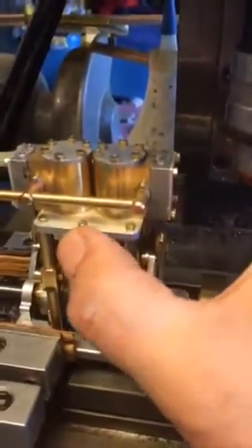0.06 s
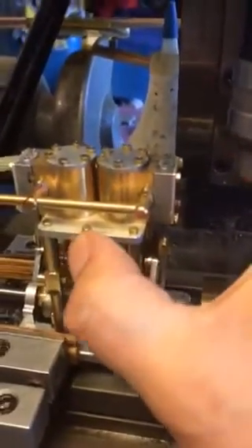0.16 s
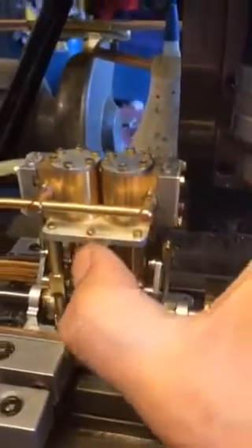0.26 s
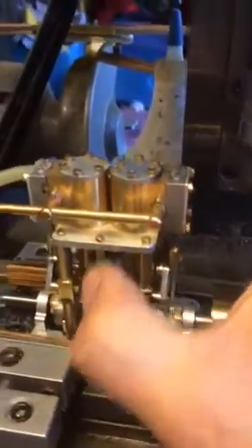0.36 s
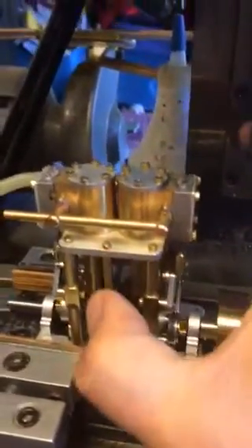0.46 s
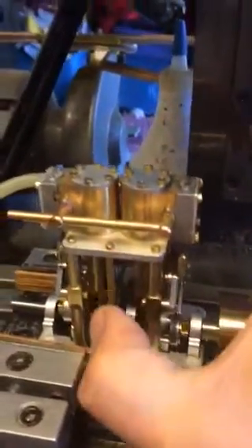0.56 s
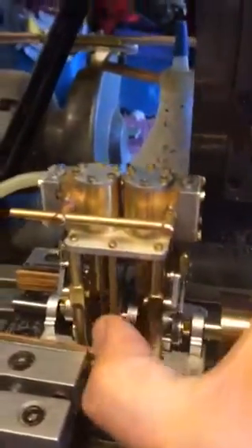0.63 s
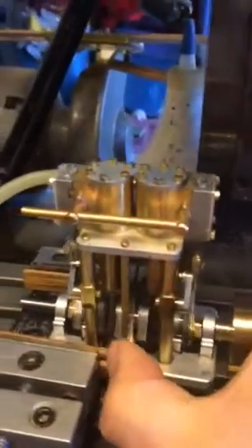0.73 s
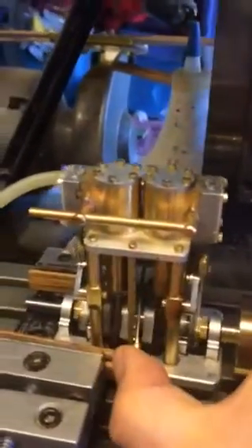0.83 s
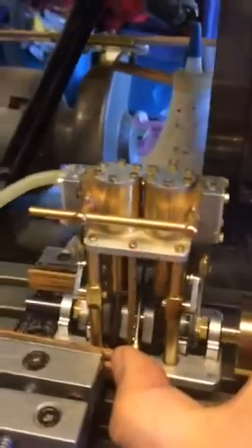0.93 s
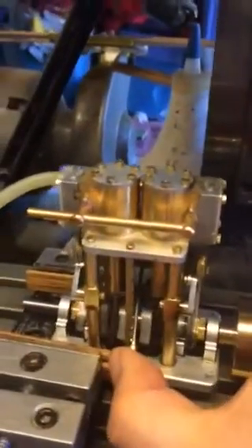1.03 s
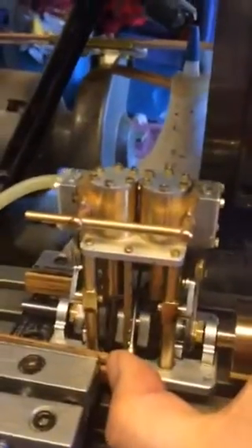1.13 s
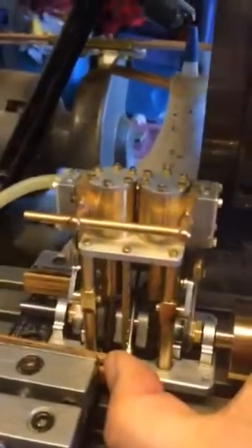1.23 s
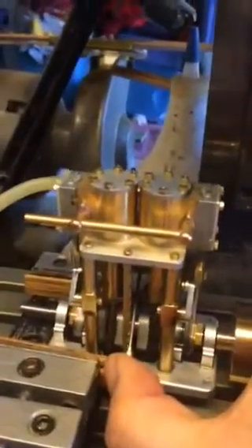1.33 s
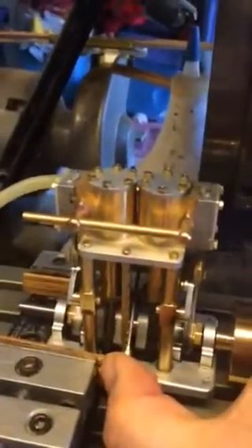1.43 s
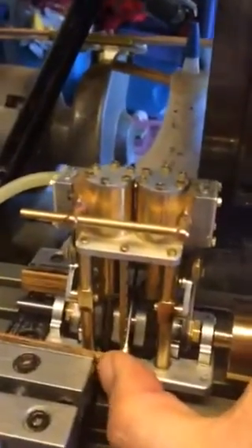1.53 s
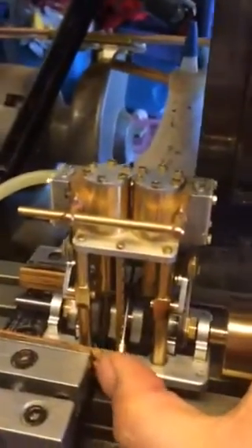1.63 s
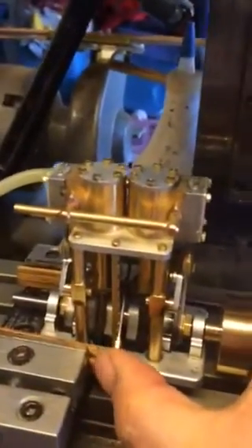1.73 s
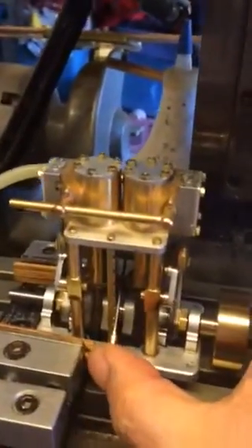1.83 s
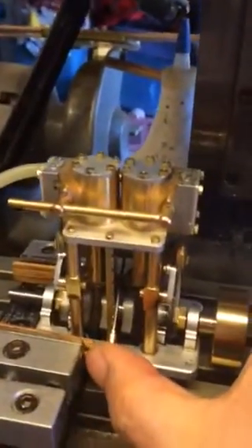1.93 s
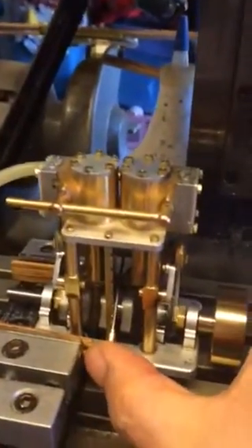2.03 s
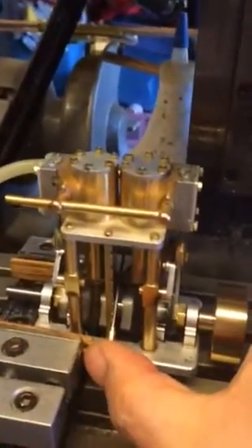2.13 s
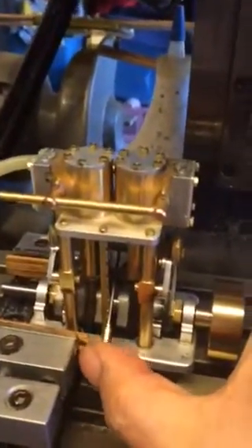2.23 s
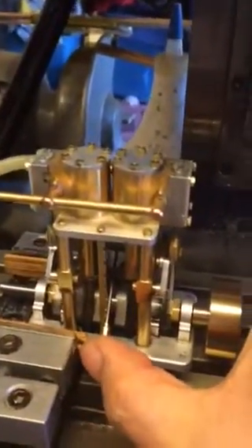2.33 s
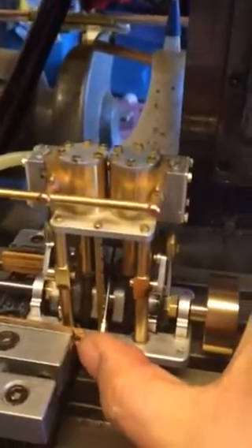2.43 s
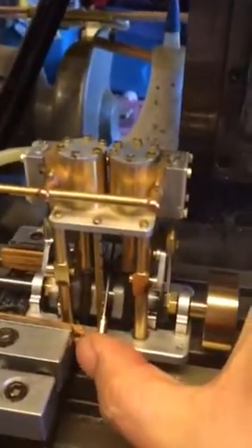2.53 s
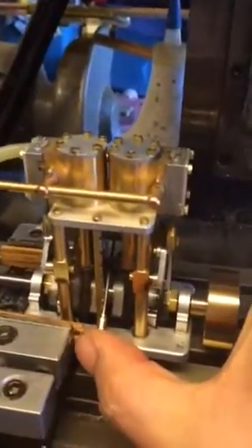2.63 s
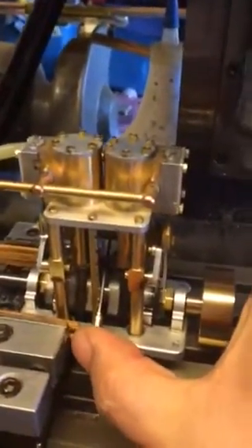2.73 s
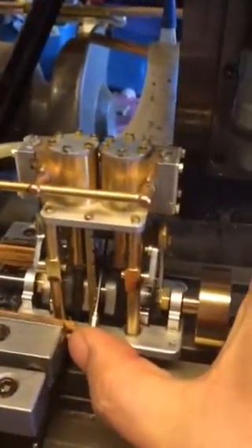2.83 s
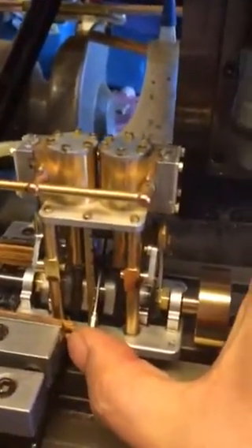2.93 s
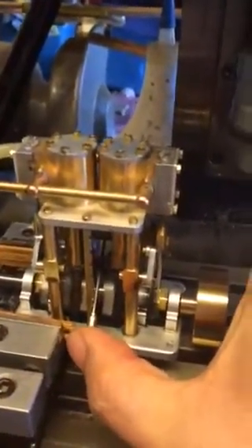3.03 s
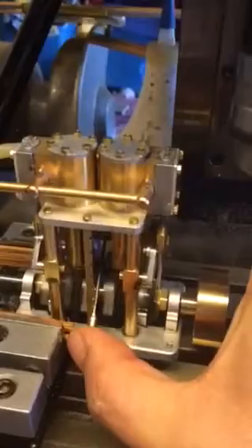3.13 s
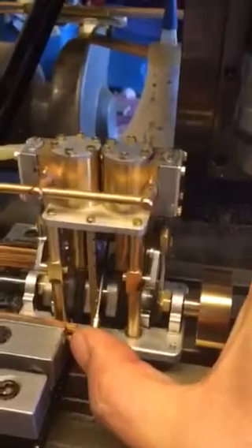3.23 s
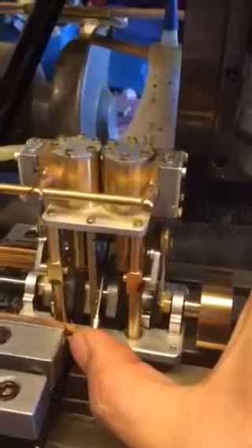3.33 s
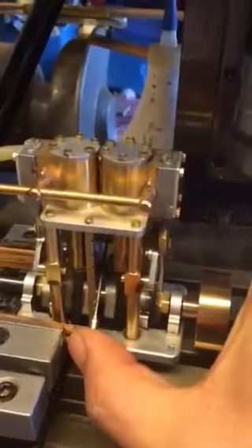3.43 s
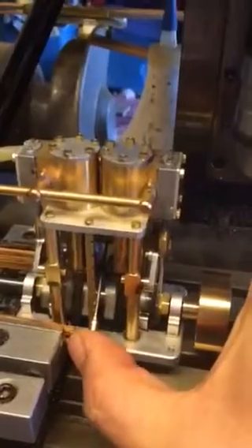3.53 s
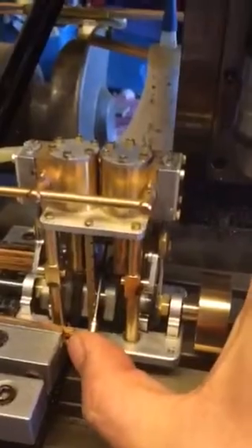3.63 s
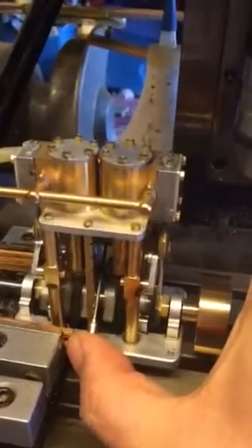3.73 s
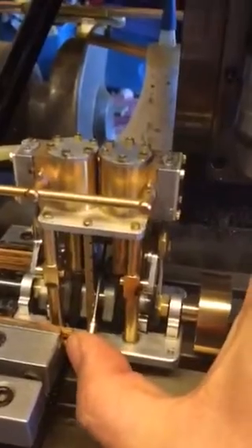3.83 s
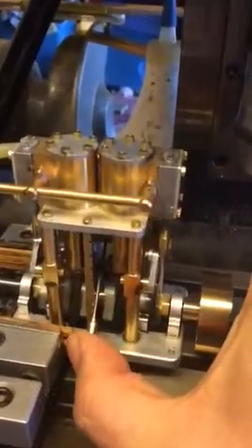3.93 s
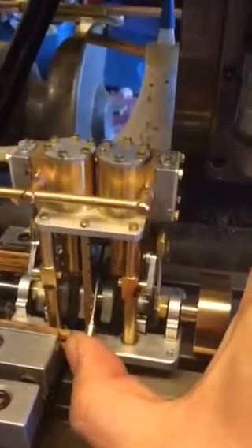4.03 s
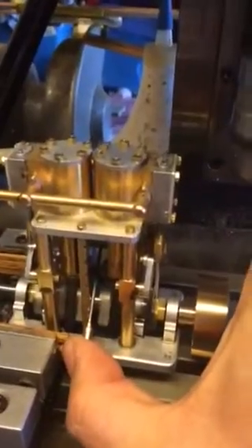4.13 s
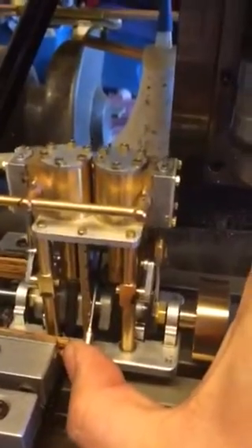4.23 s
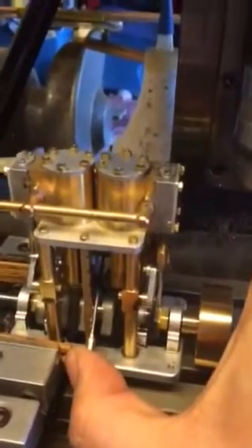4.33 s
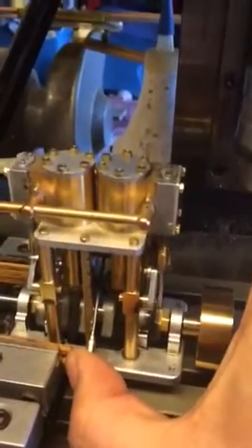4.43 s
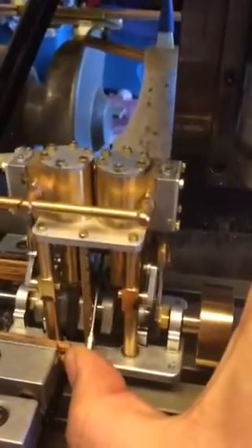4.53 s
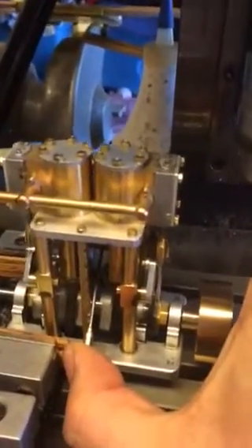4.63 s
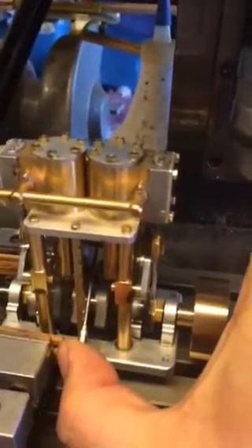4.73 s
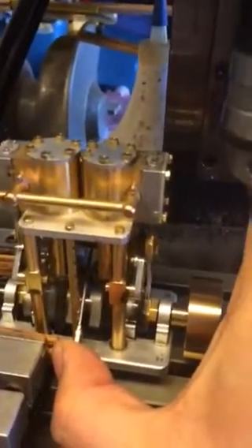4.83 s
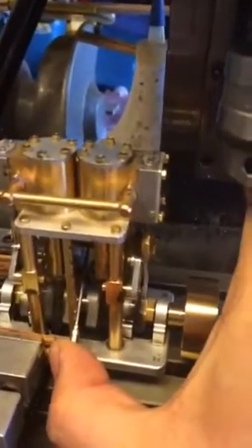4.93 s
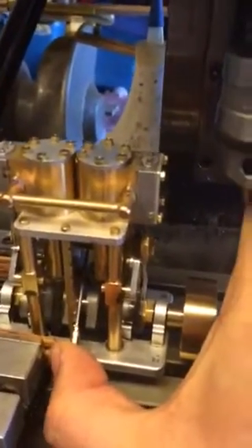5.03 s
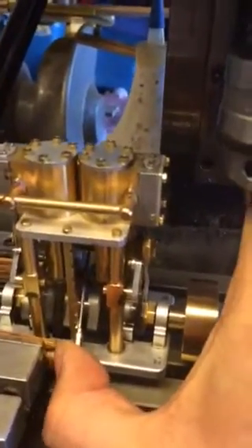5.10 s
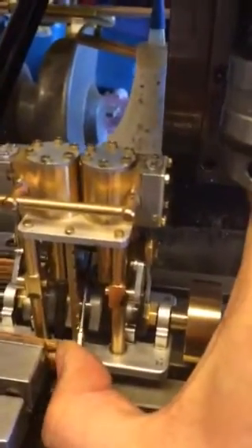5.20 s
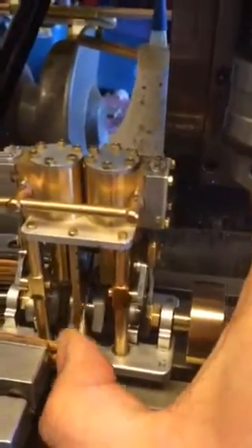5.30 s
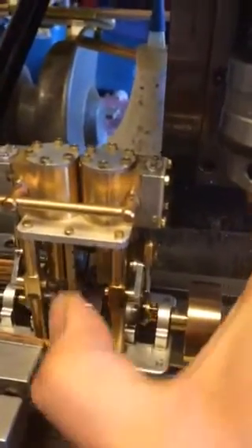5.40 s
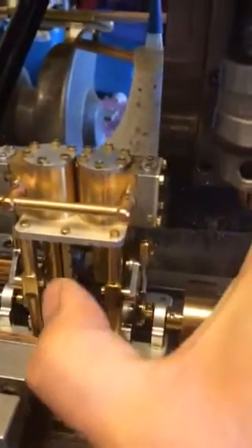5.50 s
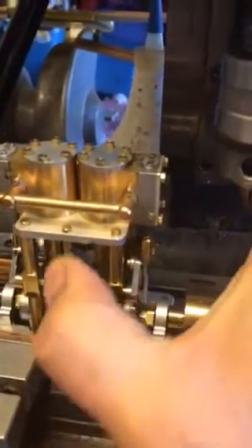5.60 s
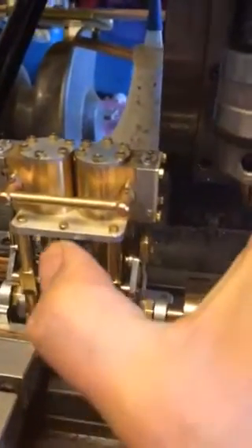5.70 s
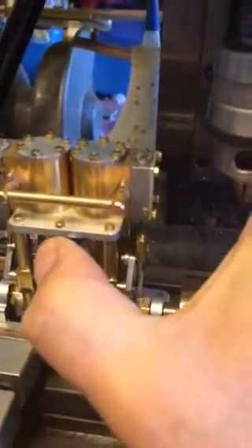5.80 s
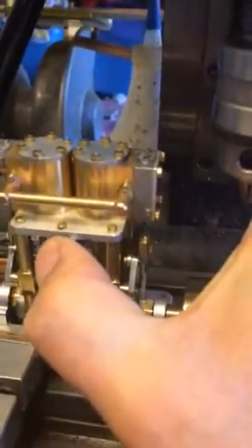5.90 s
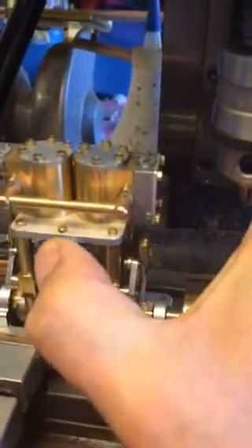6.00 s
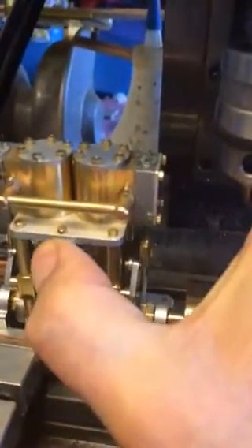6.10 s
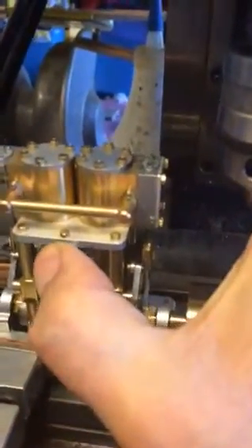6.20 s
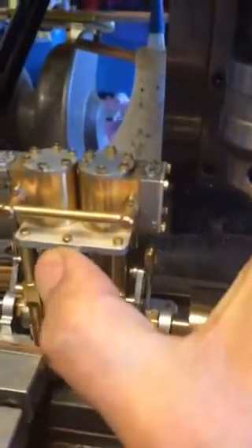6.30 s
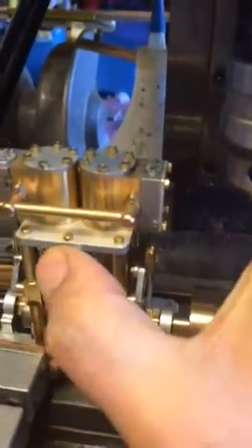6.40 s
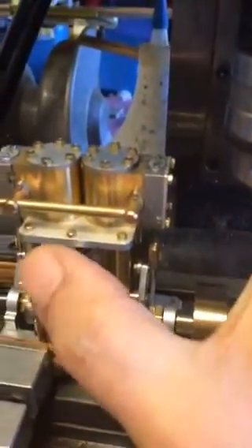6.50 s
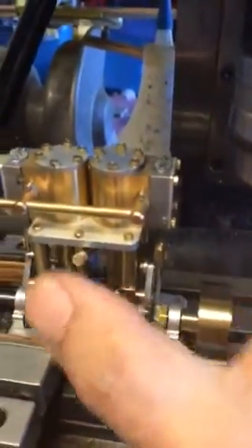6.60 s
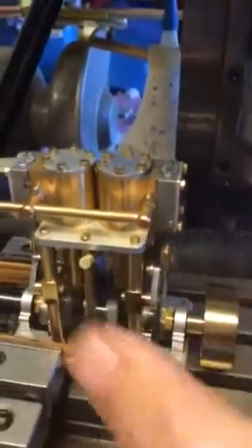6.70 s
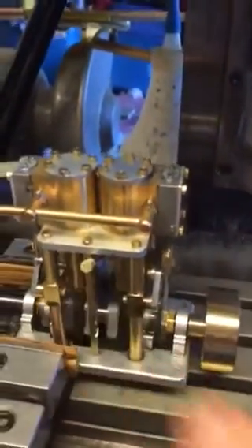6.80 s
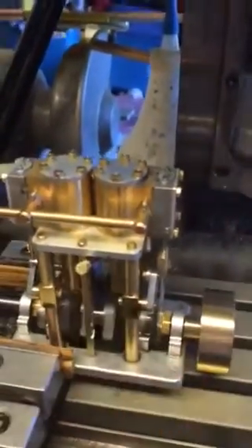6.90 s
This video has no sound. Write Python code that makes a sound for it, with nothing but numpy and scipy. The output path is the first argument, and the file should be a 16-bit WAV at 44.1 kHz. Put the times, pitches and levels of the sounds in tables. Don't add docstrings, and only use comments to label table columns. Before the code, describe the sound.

Rapid fluttering exhaust purr with bright airy hiss and light metallic rattle, interrupted twice by short stalls with clicks, puffs and abrupt restarts.

```python
import sys
import numpy as np
from scipy import signal
from scipy.fft import rfft, irfft, next_fast_len
from scipy.io import wavfile
from scipy.ndimage import uniform_filter1d

SR = 44100
rng = np.random.default_rng(int(sys.argv[2]) if len(sys.argv) > 2 else 0)


def output_pcm(signal):
    pcm = np.clip(np.atleast_2d(signal).T, -1, 1) * 32767
    wavfile.write(sys.argv[1], SR, np.round(pcm).astype(np.int16))


def makeup_ratio(level_db):
    decades = np.asarray(level_db, float) / 20
    return 10 ** decades


N = 306759
SIZE = next_fast_len(N, True)
TIME, HZ = np.arange(N) / SR, np.fft.rfftfreq(SIZE, 1 / SR) + 1e-3

# gear, crank angle at time zero in turns, steady speed in turns per second,
# time the lever starts to brake in seconds, braking in turns per second squared.
RUNS = [
    ("astern", .963, 35.4, .27, 8.4),
    ("ahead", .305, 39.815, 5.29, 15),
    ("astern", .672, 35.222, 7, 0),
]
# time in seconds, hiss level in dB.
PRESSURE = [
    [(0.0, -27), (0.468, -26.5), (0.482, -34), (0.495, -32)],
    [(0.831, -31), (0.857, -20.5), (1.06, -23.5), (1.66, -24.5), (1.67, -26), (2.23, -26), (5.14, -25.5),
     (5.41, -24.5)],
    [(5.745, -32), (5.77, -21.5), (5.821, -22.5), (5.959, -24.5), (6.429, -25.5), (6.956, -27)],
]
# time in seconds, lead in turns.
LEAD = [(0, .008), (.2, -.005), (.38, .008), (1.15, 0), (1.8, -.005), (2.5, .003), (3.05, -.013),
        (3.55, -.004), (4.05, -.022), (4.5, -.003), (5.3, .003), (5.76, -.03), (5.8, .005), (5.86, -.022),
        (6.2, .006), (6.6, .003), (6.96, .013)]
SURGE_S, SURGE_PEAK_S, SURGE_TURNS = .92, .22, {"ahead": .13, "astern": 0}
SPIN_UP_S, SPIN_UP_TAU_S, SPIN_UP_TURNS = .836, .017, {"ahead": .24, "astern": 0}

PORT_STEPS = {"ahead": [(0.0737, 0.79), (0.0799, -1.16), (0.3598, -0.41), (0.4814, 0.1), (0.5275, 0.99),
              (0.5342, -1.19), (0.7752, 0.36), (0.7878, -0.52), (0.8151, -0.24), (0.8362, 0.2)],
              "astern": [(0.0743, 0.08), (0.1212, -0.31), (0.2403, -0.04), (0.3582, -0.44), (0.3918, 0.08),
              (0.5226, 0.05), (0.5502, -0.38), (0.5858, 0.05), (0.7872, 0.37), (0.8062, -0.43)]}
# frequency in Hz, width in Hz, gain.
PIPE_RESONANCES = [(218, 30, -0.35), (599, 140, 1.89), (920, 118, 1.5), (1201, 40, 2.02), (1472, 40, 1.35)]
ORDER_DB = {"ahead": [(1, -28), (2, -13.5), (3, 0), (4, 2), (5, -5), (6, -15), (7, -2.5), (8, -13),
            (9, -13), (10, -15), (11, -3.5), (12, -10), (13, -12.5), (14, -8.5), (15, -4), (16, -8.5),
            (17, -8.5), (18, -11), (19, -49), (20, -12.5), (21, -24), (22, -8.5), (23, -19), (24, -8.5),
            (25, -20), (26, -16), (27, -16), (28, -24.5), (29, -25), (30, -17), (31, -16), (32, -18),
            (33, -19), (34, -16), (35, -16.5), (36, -23.5), (37, -13), (38, -24)], "astern": [(1, -26),
            (2, -45), (3, -8), (4, 2.5), (5, -1), (6, -12), (7, -5), (8, -45), (9, -7), (10, -7.5),
            (11, -10), (12, -10.5), (13, -11.5), (14, -33), (15, -5.5), (16, -2.5), (17, -9), (18, -9.5),
            (19, -38), (20, -9), (21, -16), (22, -15.5), (23, -20), (24, -23), (25, -17), (26, -11.5),
            (27, -21), (28, -19), (29, -32), (30, -26), (31, -23), (32, -33), (33, -35), (34, -19),
            (35, -24.5), (36, -17), (37, -15.5), (38, -17)]}
ORDER_WANDER_DB, ORDER_WANDER_HZ = -15, 2.9
PIPE_SONG = {"ahead": (715, 70, 0.5), "astern": (560, 90, -9.0)}
WORKING_DB, THUMP_DB = -26, {"ahead": -31.5, "astern": -32.5}
THUMP_FOLLOWS, CHOKE_DB = 0.82, 2.5

RELEASES = { "ahead": [(.19, .085, .8, -7), (.475, .095, 1.4, -5), (.63, .055, 2, -3), (.87, .075, -1, -4)],
            "astern": [(.19, .09, .8, -2), (.35, .08, .8, -2), (.62, .09, -1, -7), (.92, .07, -4, -5)], }
WHISTLES = { "ahead": [(.19, .07, -2), (.43, .06, 1.5), (.53, .05, -.5), (.62, .05, 1.5), (.86, .05, -4)],
            "astern": [(.22, .09, 5.5), (.33, .04, 0), (.59, .06, -2), (.9, .07, -4)], }
BETWEEN_DB = -5
WHISTLE_FROM_HZ, WHISTLE_DB = {"ahead": 14600, "astern": 12000}, {"ahead": -4.5, "astern": 1}
HOLLOW_DB = {"ahead": 4, "astern": 3}
JET_COLOUR = {"ahead": [(880, -11), (1500, -11), (1790, -10), (2410, -16.5), (2850, -9.5), (4080, -10.5),
              (5790, -0.5), (7530, -7), (9790, 0.5), (15300, -9.5)], "astern": [(880, -43), (1500, -9.5),
              (2690, -2.5), (3960, -15.5), (4500, -17), (5850, -7), (8380, 1), (10100, 2), (12200, -12),
              (15300, -9)]}
JET_RINGS = {"ahead": [(6090, 450, -3.5), (7100, 190, -8.5), (7670, 96, -11), (8700, 330, -3.5),
             (9500, 210, -3.5), (12600, 280, -16), (13500, 400, -7.5), (14650, 280, -5), (15350, 220, 3.5)],
             "astern": [(5870, 610, 3.5), (7150, 230, 1.5), (7700, 170, -1.5), (9010, 270, 2),
             (9970, 750, 1), (11230, 340, 0), (12200, 120, -33), (14160, 1100, -3.5), (15040, 200, 2)]}
ROAR = { "ahead": [(30, -34), (70, -2), (150, 4.5), (400, -5), (600, -3), (1000, 3), (2000, 4.5),
        (3500, -36)], "astern": [(30, -13), (70, -0.5), (150, -3), (400, -2.5), (700, -5), (1000, -1),
        (2000, -12.5), (3500, -43)], }
DIPS = { "ahead": [(800, 60, 0.3), (1125, 80, 1), (1376, 51, 0.9), (1536, 205, 0.67), (1872, 28, 0.9),
        (2600, 130, 0.83), (3970, 120, 0.7), (4520, 460, 0.41), (6315, 206, 0.8), (7930, 220, 0.16),
        (8600, 160, 0.4), (11400, 200, .4), (12000, 250, .35), (12800, 200, .3), (13350, 150, .4),
        (14250, 220, .3)], "astern": [(780, 80, 0.9), (1096, 93, 0.9), (1390, 69, 0.3), (1650, 170, 0.3),
        (2640, 430, 0.69), (7920, 160, 0.36), (8450, 140, 0.5), (9360, 224, 0.8), (11850, 110, .3),
        (12200, 120, .15), (12550, 150, .3), (12900, 120, .2), (13200, 150, .25), (14300, 170, .75)], }

KNOCKS = { "ahead": [(.015, 1780, .028, -7, 4), (.5, 1320, .03, -7, 2), (.47, 5500, .014, 6, 3),
          (.17, 4800, .012, 3, 3), (.0, 2860, .015, -5, 2.5), (.1, 3250, .018, -4, 2.5),
          (.57, 2800, .015, -3, 3), (.57, 3800, .015, -2, 4), (.64, 3600, .012, -3, 2),
          (.87, 3200, .022, -3, 4), (.85, 3820, .018, -2, 3), (.93, 2270, .02, -11, 1.5),
          (.65, 2650, .018, 0, 3), (.985, 3850, .02, -3, 3), (.07, 3700, .015, -4, 3),
          (.635, 8000, .009, 9, 2), (.59, 11300, .014, 5, 2), (.32, 9500, .016, 7, 3)],
          "astern": [(.335, 3950, .02, 6, 3), (.385, 3600, .016, 2, 3), (.18, 4700, .012, 1, 3),
          (.3, 5400, .016, 7, 3), (.6, 2900, .014, -5, 3), (.1, 2250, .028, -6, 3),
          (.33, 3200, .012, -4, 2), (.33, 1270, .15, -19, -1.5), (.97, 1800, .02, -9, 3),
          (.13, 3000, .012, -4, 3), (.57, 3800, .018, -5, 3), (.87, 3000, .02, -6, 3),
          (.03, 3800, .015, -5, 3), (.33, 8000, .012, 5, 2), (.4, 9300, .014, 5, 3),
          (.65, 9500, .014, 6, 3), (.02, 9300, .014, 6, 3)], }
# time in seconds, peak level in dB.
CLANKS = [(1.0183, -29), (1.0697, -30), (1.0936, -30), (1.144, -30), (1.1944, -31), (1.2198, -31),
          (1.2702, -31), (1.4189, -32), (1.4468, -30), (1.4723, -31), (1.5226, -32), (1.574, -31),
          (1.5955, -32), (1.7242, -29), (1.7985, -34), (1.9038, -34), (2.0245, -33), (2.249, -34),
          (2.3533, -31), (2.454, -31), (2.5249, -32), (2.7055, -33), (2.7514, -32), (2.9055, -29),
          (3.0542, -33), (3.104, -32), (3.132, -31), (3.2043, -34), (3.358, -31), (3.5056, -33),
          (3.5555, -32), (3.6064, -34), (3.6338, -31), (3.6837, -32), (3.7596, -32), (3.8608, -31),
          (3.9102, -33), (4.011, -32), (4.0369, -33), (4.1093, -33), (4.1881, -31), (4.2125, -31),
          (4.2589, -34), (4.3123, -32), (4.4854, -33), (4.5094, -35), (4.5393, -34), (4.5612, -32),
          (4.5877, -31), (4.6396, -34), (4.6894, -31), (4.7638, -33), (4.9154, -31), (4.9908, -30),
          (5.1913, -29), (5.2926, -31)]
# frequency in Hz, level in dB, time to fade by 60 dB in seconds.
ROD_TONES = [(1780, 3.5, .028), (1930, -2, .022)]
ROD_RISE_S = .0015
# time in seconds, frequency in Hz,
# time to fade by 60 dB in seconds, level in dB.
PINGS = [(.535, 2700, .02, -48), (.535, 2000, .02, -50), (.648, 1600, .05, -62), (.700, 1620, .06, -60),
         (.757, 2900, .03, -54), (.690, 520, .2, -54), (5.408, 2050, .025, -31), (5.453, 1260, .07, -43),
         (5.5203, 585, .035, -39), (5.5203, 1650, .015, -47), (5.5203, 1150, .01, -50),
         (5.5203, 2250, .012, -52), (5.533, 510, .14, -47), (5.6665, 3300, .012, -28),
         (5.667, 7400, .03, -34), (5.700, 14800, .02, -22), (5.699, 3000, .02, -32),
         (5.700, 2450, .018, -36), (5.722, 3000, .02, -40), (5.810, 735, .06, -30), (5.667, 950, .03, -42),
         (5.835, 950, .2, -36)]

# time in seconds, hiss peak in dB,
# time to fade by 60 dB in seconds, thump in dB, metal in dB.
COUGHS = [(.494, -8.5, 0.049, -25, -37), (0.81, -21, 0.028, -27, -29), (0.818, -5, 0.034, -27, -34),
          (.822, -9, 0.019, -45, -25), (.836, -5, 0.016, -42, -33), (0.846, -7, 0.029, -45, -26),
          (.855, -5, .035, -42, -36), (5.433, -14, 0.038, -41, -48), (5.442, -18, .016, -34, -49),
          (5.459, -16, 0.018, -51, -34), (5.467, -52, .076, -47, -52), (5.672, -34, 0.082, -52, -43),
          (5.6845, -12.5, 0.037, -30, -46), (5.689, -14, 0.023, -45, -47), (5.699, -14, .022, -29, -39),
          (5.7025, -16, 0.024, -45, -38), (5.720, -26, 0.058, -45, -47), (5.730, -21, 0.066, -45, -45),
          (5.738, -4, 0.039, -19, -24), (5.7495, -7, .035, -40, -32)]
TICKS = [(.534, -36, .026, -50, -47), (.548, -42, .026, -60, -52), (.7895, -29, .012, -60, -62),
         (.798, -37, .04, -60, -62), (5.520, -44, .016, -62, -56), (5.469, -44, .026, -55, -48),
         (5.5657, -52, .026, -60, -63), (5.6662, -24, 0.018, -47, -30)]
COUGH_RISE_SHARE, TICK_RISE_S = 0.05, 0.00029
# time in seconds, thump in dB.
THUDS = [(.610, -47), (.693, -35), (0.706, -39), (0.714, -37), (0.724, -35), (5.540, -43)]

# time in seconds, peak level in dB.
TAPS = [(.668, -68), (.690, -63), (.703, -70), (.718, -61), (0.732, -63), (.755, -65), (.782, -64),
        (0.808, -49), (5.493, -62), (5.5206, -62), (5.536, -60), (5.575, -72), (5.667, -61)]
# frequency in Hz, level in dB, time to fade by 60 dB in seconds.
LEVER_TONES = [(510, -1, .14), (600, 3, .03), (980, -11, .02), (1700, -5, .015), (2290, -12, .015),
               (2900, -16, .03)]
# frequency in Hz, width in Hz, level in dB.
SQUEAK = [(5900, 160, -1), (7100, 140, -1), (9000, 300, -1), (10200, 300, -4), (2900, 160, -8),
          (1720, 300, -5)]
# time in seconds, level in dB.
SQUEAK_SWELL = [(.73, -75), (.75, -55), (.775, -55), (.79, -66), (.81, -58)]
# frequency in Hz, width in Hz, level in dB.
RUB = [(520, 43, 4), (990, 70, -4), (2350, 100, -4), (1620, 200, 0.1), (2870, 150, -2)]
RUB_S, RUB_DB = (0.67, 0.76), -67

# stop in seconds, restart in seconds, stirring beforehand in seconds,
# room still ringing in dB.
STALLS = [
    (0.481, 0.841, 0.058, 19),
    (5.418, 5.766, 0.072, 24),
]
# frequency in Hz, level in dB per Hz.
MURMUR = [(350, -36), (600, 8), (951, 3), (1230, -1), (1640, -12), (1820, -10), (2740, -13), (3400, -13),
          (4700, -24), (5400, -26), (6090, -17), (6600, -20), (9780, -22), (15300, -6)]
# frequency in Hz, level in dB per Hz.
RUMBLE = [(25, -18), (60, -2), (130, 9.0), (240, 5.5), (340, -4), (440, -1.5), (800, -14.5)]
SETTLE_S, LEAK_CREEP_DB_PER_S = 0.1, 48
LEAK_DB, MURMUR_DB, RUMBLE_DB = (-82.5, 43, 18), (-67.5, 14), (-58.5, 21, 38)


def engine(run, pressure):
    gear, _, speed, *_ = run
    turns, lost = crank(*run)
    turns = turns + np.interp(TIME, *np.transpose(LEAD)) + .0011 * flicker(20)
    running, (hiss_db,) = in_time(pressure)
    choked = np.minimum(lost, 3)

    thump_db = THUMP_DB[gear] + THUMP_FOLLOWS * (hiss_db - WORKING_DB) - CHOKE_DB * choked
    thump = exhaust(turns, gear, speed) * makeup_ratio(0.46 * flicker(80))
    sing_hz, sing_width, sing_db = PIPE_SONG[gear]
    song_gain = 1j * HZ * sing_width / (sing_hz ** 2 - HZ ** 2 + 1j * HZ * sing_width)
    thump = thump + makeup_ratio(sing_db) * choked * shaped(thump, song_gain)

    rows = np.array(RELEASES[gear])
    gusts = makeup_ratio(0.58 * flicker(230) + 0.35 * flicker(25))
    deep = released(turns, rows[:, [0, 1, 3]], -5.5) * makeup_ratio(HOLLOW_DB[gear])
    bright = released(turns, rows[:, :3])
    top = makeup_ratio(WHISTLE_DB[gear]) * released(turns, WHISTLES[gear], -1.7)
    hollow, hiss, whistle = jet(gear)
    air = gusts * (deep * hollow + bright * hiss + top * whistle)
    roar = makeup_ratio(-10.0) * deep * noise(colour(ROAR[gear]) * dips(gear))
    rattle = makeup_ratio(-12.0) * knocks(turns, gear, running)
    return running * (makeup_ratio(thump_db - 1.43) * (thump + roar) + makeup_ratio(hiss_db + 0.06) * (air + rattle))


def crank(gear, angle, speed, brake_s, braking):
    age = np.maximum(TIME - SURGE_S, -.02) / SURGE_PEAK_S
    surge = SURGE_TURNS[gear] * age * np.exp(1 - age)
    slow_start = SPIN_UP_TURNS[gear] * np.exp(np.minimum((SPIN_UP_S - TIME) / SPIN_UP_TAU_S, 1))
    held = np.maximum(TIME - brake_s, 0)
    turns = angle + speed * TIME + surge + slow_start - braking * held ** 2 / 2
    return turns, braking * held


def exhaust(turns, gear, speed_hz):
    k, db = np.transpose(ORDER_DB[gear])
    steps = pipe(k * speed_hz) * sum(size * np.exp(-2j * np.pi * k * turn) for turn, size in PORT_STEPS[gear])
    orders = makeup_ratio(db) * steps / np.abs(steps)
    changes = orders * np.sqrt(k / 12) * np.exp(2j * np.pi * rng.random((2, len(k))))
    table = irfft(np.c_[np.zeros(3), np.vstack([orders, changes])], 1024)
    table = table / np.std(table[0])
    angles = np.arange(1024) / 1024
    usual, *other = [np.interp(turns % 1, angles, row, period=1) for row in table]
    return usual + makeup_ratio(ORDER_WANDER_DB) * sum(flicker(ORDER_WANDER_HZ) * part for part in other)


def pipe(hz):
    s = 1j * hz
    step = s * s / (s * s + 53 * s + 100 ** 2) / (1 + s / 47) / (1 + s / 428)
    ringing = sum(gain * s * width / (s * s + s * width + f ** 2) for f, width, gain in PIPE_RESONANCES)
    return step * (1 + ringing)


def released(turns, rows, between_db=BETWEEN_DB):
    power = makeup_ratio(2 * between_db)
    for turn, width, db in rows:
        away = (turns - turn + .5) % 1 - .5
        power = power + makeup_ratio(2 * db) * np.exp(-(away / width) ** 2)
    return np.sqrt(power)


def jet(gear, smooth_db=-5):
    smooth = colour(JET_COLOUR[gear]) * makeup_ratio(smooth_db)
    air = noise(np.sqrt(smooth ** 2 + peaks(JET_RINGS[gear])) * dips(gear))
    whistle = shaped(air, 1 / (1 + (WHISTLE_FROM_HZ[gear] / HZ) ** 60))
    hollow = shaped(air, 1 / (1 + (HZ / 4400) ** 16))
    return hollow, air - whistle - hollow, whistle


def knocks(turns, gear, running):
    play, force = .0011 * flicker(30), np.tanh(flicker(60))
    out, now = np.zeros(N), np.flatnonzero(running > 0)
    for turn, hz, t60, db, spread_db in KNOCKS[gear]:
        struck = strikes((turns + play * (spread_db / 3) ** 3)[now], turn)
        blow_db = db + spread_db * np.roll(force, int(turn * SR))[now]
        out[now] += ring(struck * makeup_ratio(blow_db), hz, t60)
    return out


def strikes(turns, turn):
    return np.diff(np.floor(turns - turn), prepend=1e9) > 0


def contacts():
    hits = [(s, hz * rng.uniform(.985, 1.015), t60, db + level_db, ROD_RISE_S)
            for s, db in CLANKS for hz, level_db, t60 in ROD_TONES]
    hits += [(*ping, TICK_RISE_S) for ping in PINGS]
    out, age = np.zeros(N), TIME[:SR // 8]
    for s, hz, t60, db, rise in hits:
        shape = makeup_ratio(db - 60 * age / t60) * (1 - np.exp(-age / rise))
        out[int(s * SR):int(s * SR) + len(age)] += shape * np.sin(2 * np.pi * hz * age)
    return out


def puffs():
    hollow, hiss, whistle = jet("astern")
    air = makeup_ratio(2.5) * hollow + hiss + makeup_ratio(4.0) * whistle
    metal_colour = [(300, -3), (600, 2.0), (1200, 1.5), (2000, -15.0), (3000, 3.0), (4500, -6.0), (6000, -43)]
    metal = noise(colour(metal_colour))
    out, clicks = np.zeros(N), np.zeros(N)
    age = TIME[:SR // 4]
    bursts = [(*cough, COUGH_RISE_SHARE * cough[2]) for cough in COUGHS]
    bursts += [(*tick, TICK_RISE_S) for tick in TICKS]
    for s, hiss_db, t60, thump_db, metal_db, rise in bursts:
        now = slice(int(s * SR), int(s * SR) + len(age))
        shape = np.minimum(age / rise, 1) * makeup_ratio(-60 * (np.maximum(age - rise, 0) / t60) ** 1.25)
        out[now] += shape * (makeup_ratio(hiss_db - 14.5) * air[now] + makeup_ratio(metal_db - 6.0) * metal[now])
        clicks[int(s * SR)] = -makeup_ratio(thump_db)
    for s, thump_db in THUDS:
        clicks[int(s * SR)] = -makeup_ratio(thump_db)
    boom = makeup_ratio(-2.5) * ring(clicks, 120, 0.041)
    return out + makeup_ratio(14.0) * shaped(clicks, pipe(HZ)) + boom


def lever():
    out = np.zeros(N)
    tap_at, tap_db = [int(s * SR) for s, db in TAPS], np.array(TAPS)[:, 1]
    for hz, level_db, t60 in LEVER_TONES:
        clicks = np.zeros(N)
        clicks[tap_at] = makeup_ratio(tap_db + level_db + rng.normal(0, 1.5, len(TAPS)))
        out += ring(clicks, hz, t60)
    gate, (squeak_db,) = in_time(SQUEAK_SWELL)
    return out + gate * makeup_ratio(squeak_db) * noise(np.sqrt(peaks(SQUEAK)))


def guide():
    gate, _ = in_time([(RUB_S[0],), (RUB_S[1],)], fade=.04)
    return gate * makeup_ratio(RUB_DB + 2.5 * flicker(40)) * noise(peaks(RUB))


def stalls():
    hollow, bright, top = jet("astern", smooth_db=-10)
    leak = makeup_ratio(-11.0) * hollow + bright + makeup_ratio(-4.0) * top
    murmur = noise(colour(MURMUR) * dips("astern"))
    rumble = noise(colour(RUMBLE)) * makeup_ratio(1.03 * flicker(30))
    out = np.zeros(N)
    for stop, restart, stir, ringing_db in STALLS:
        gate, _ = in_time([(stop - .03,), (restart,)])
        dying = np.clip(1 - (TIME - stop) / SETTLE_S, 0, 1)
        waking = np.clip(1 - (restart - TIME) / stir, 0, 1)
        creep_db = LEAK_CREEP_DB_PER_S * np.clip(TIME - stop, 0, restart - stop)
        leak_db = LEAK_DB[0] + creep_db + LEAK_DB[1] * dying + LEAK_DB[2] * waking
        murmur_db = MURMUR_DB[0] + 3.3 * flicker(25) + ringing_db * dying + MURMUR_DB[1] * waking
        rumble_db = RUMBLE_DB[0] + RUMBLE_DB[1] * dying + RUMBLE_DB[2] * waking
        out += gate * (makeup_ratio(leak_db) * leak + makeup_ratio(murmur_db) * murmur + makeup_ratio(rumble_db) * rumble)
    return shaped(out, 1 - .55 / (1 + ((HZ - 4200) / 1100) ** 4))


def dips(gear):
    return np.prod([1 - np.clip(depth, 0, .98) / (1 + (2 * (HZ - hz) / width) ** 2)
                    for hz, width, depth in DIPS[gear]], axis=0)


def peaks(rows):
    return sum(makeup_ratio(2 * db) / (1 + (2 * (HZ - hz) / width) ** 2) for hz, width, db in rows)


def ring(clicks, hz, t60):
    r, w = makeup_ratio(-60 / (t60 * SR)), 2 * np.pi * hz / SR
    return signal.lfilter([0, np.sin(w)], [1, -2 * r * np.cos(w), r * r], clicks + 1e-18)


def in_time(rows, fade=0.034):
    s, *columns = np.transpose(rows)
    since_start = TIME - s[0] + (s[0] <= 0)
    until_end = s[-1] - TIME + (s[-1] > 6.9)
    gate = np.clip(np.minimum(since_start, until_end) / fade + .5, 0, 1)
    return gate, [np.interp(TIME, s, c) for c in columns]


def colour(points):
    hz, db = np.transpose(points)
    return makeup_ratio(np.interp(np.log(HZ), np.log(hz), db))


def noise(gain):
    return rms_one(shaped(rng.standard_normal(SIZE), gain))


def flicker(rate_hz):
    return noise(1 / (1 + (HZ / rate_hz) ** 2))


def shaped(x, gain):
    return irfft(rfft(x, SIZE) * gain, SIZE)[:N]


def rms_one(x):
    return x / np.sqrt(np.mean(x ** 2) + 1e-20)


def scene():
    runs = sum(engine(run, pressure) for run, pressure in zip(RUNS, PRESSURE))
    return (runs + contacts() + puffs() + lever() + guide() + stalls())[None]


def thin_treble(x, below_db=-5.0, wander_db=3.0):
    hz, _, frames = signal.stft(x, SR, nperseg=1024)
    power = uniform_filter1d(np.abs(frames) ** 2, size=3, axis=1)
    band = uniform_filter1d(power, size=5, axis=0)
    around = uniform_filter1d(power, size=61, axis=0)
    luck = uniform_filter1d(rng.standard_normal(power.shape), size=5, axis=0)
    luck = uniform_filter1d(luck, size=9, axis=1)
    tilt_db = np.interp(hz, [9000, 12000], [-4.5, .7])[:, None]
    bar_db = below_db + wander_db * rms_one(luck) + tilt_db
    keep = 1 / (1 + (around * makeup_ratio(2 * bar_db) / (band + 1e-20)) ** 8)
    keep[(hz < 6000) | (hz > 14700)] = 1
    return signal.istft(frames * keep, SR, nperseg=1024)[1][:N]


def roll_off(x):
    return signal.sosfilt(signal.butter(12, 16220, fs=SR, output="sos"), x)


def record(dry):
    bass_cut = HZ / (HZ - 40j)
    wall = (np.clip((15330 - HZ) / 60, 0, 1) ** 2 + 1.5e-4) * bass_cut
    mix = thin_treble(shaped(dry[0], wall))[None]
    return roll_off(mix)


dry = scene()
out = record(dry)
output_pcm(out)
```